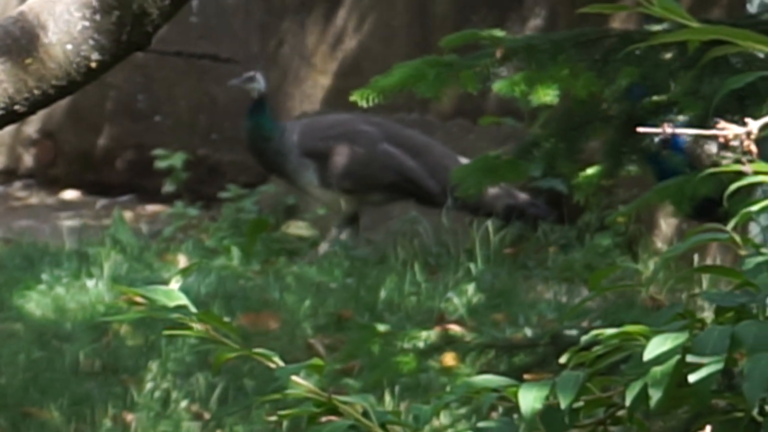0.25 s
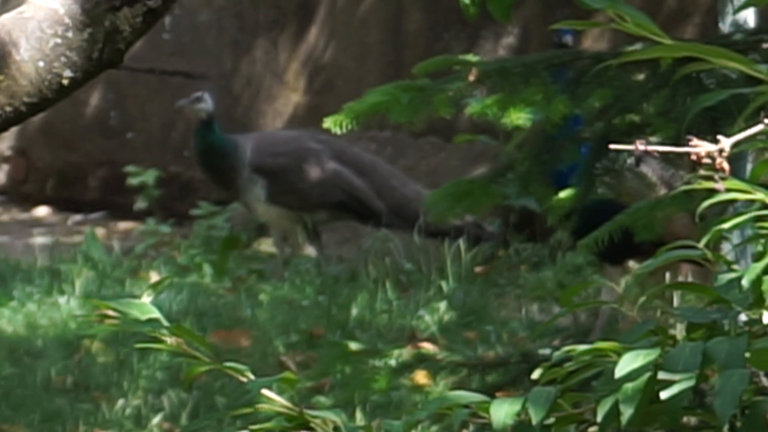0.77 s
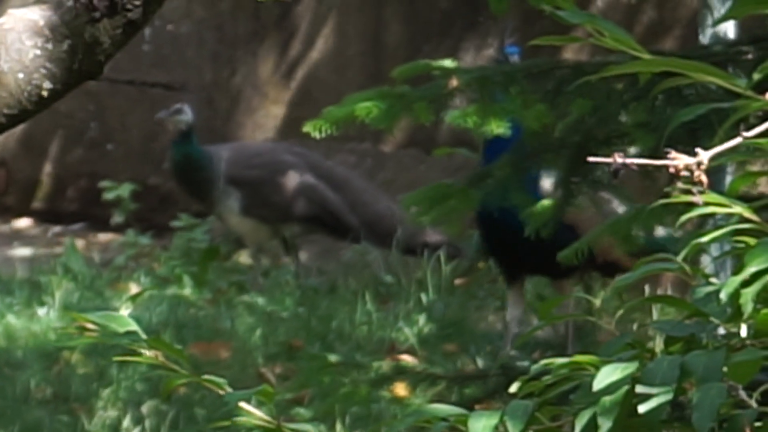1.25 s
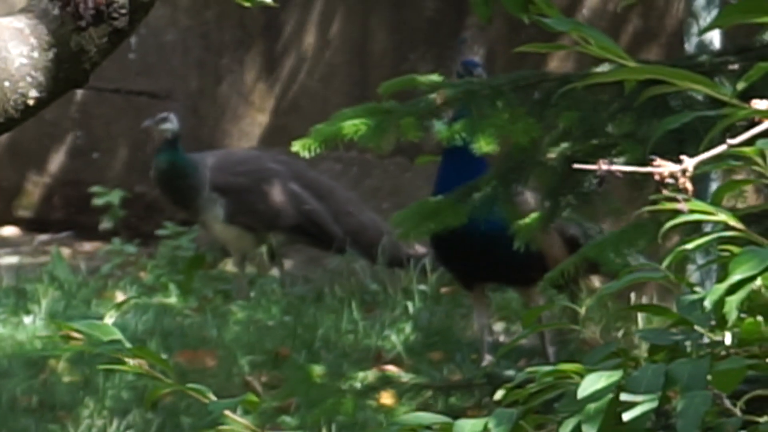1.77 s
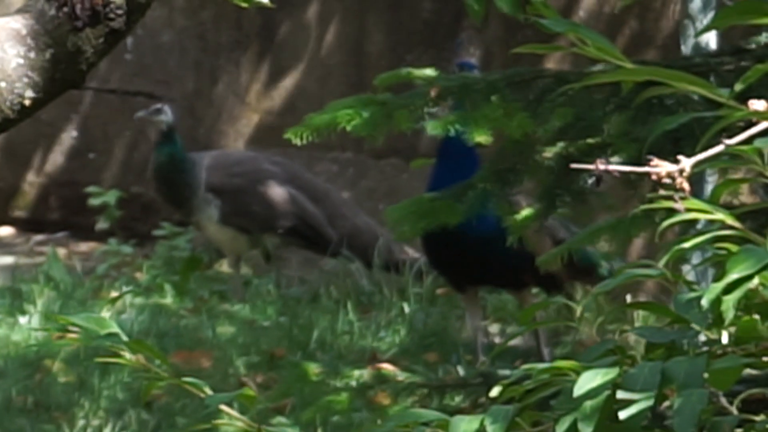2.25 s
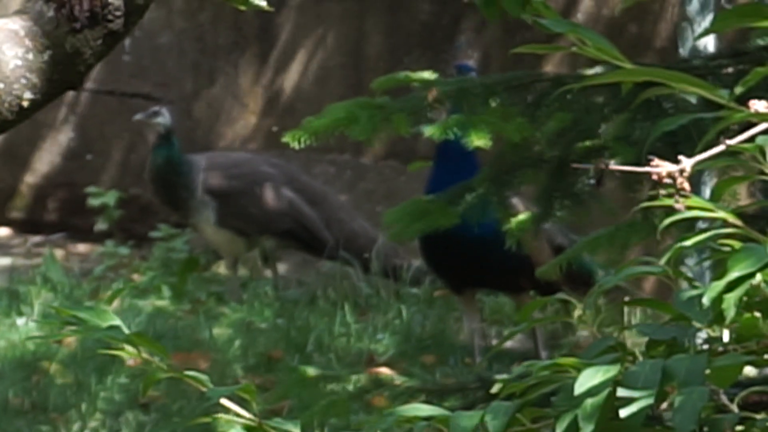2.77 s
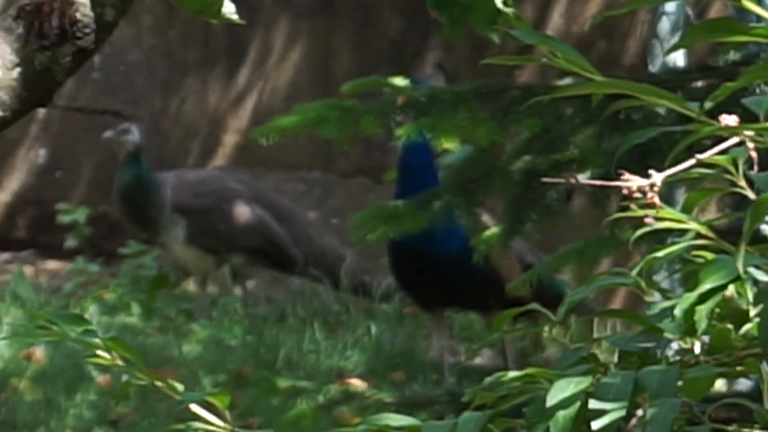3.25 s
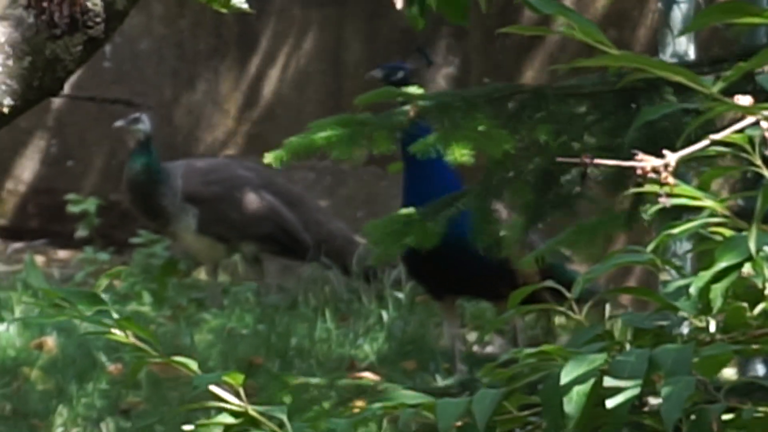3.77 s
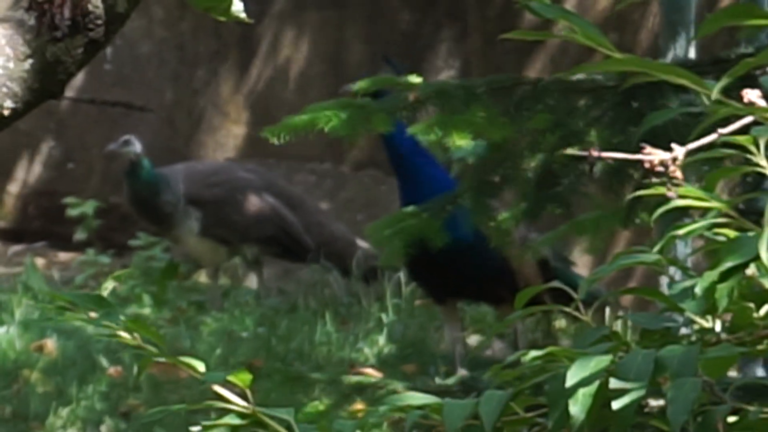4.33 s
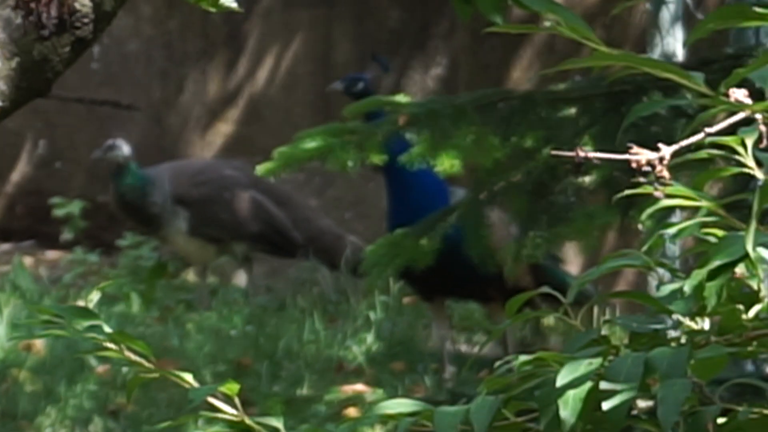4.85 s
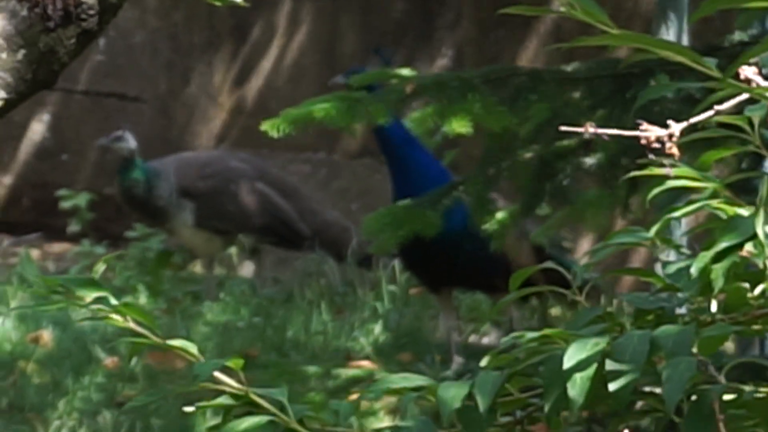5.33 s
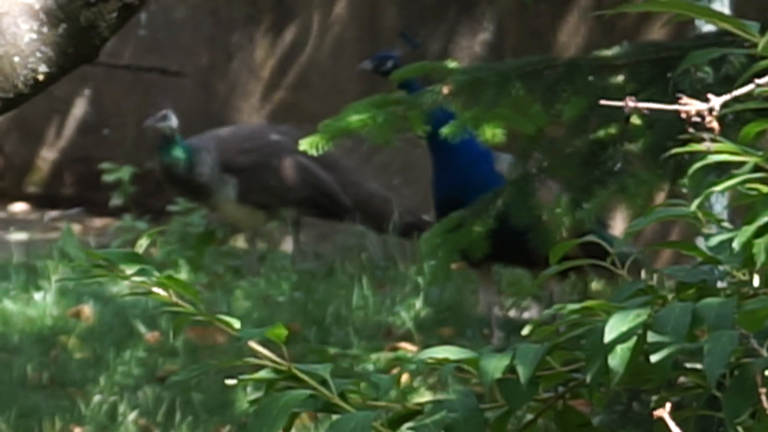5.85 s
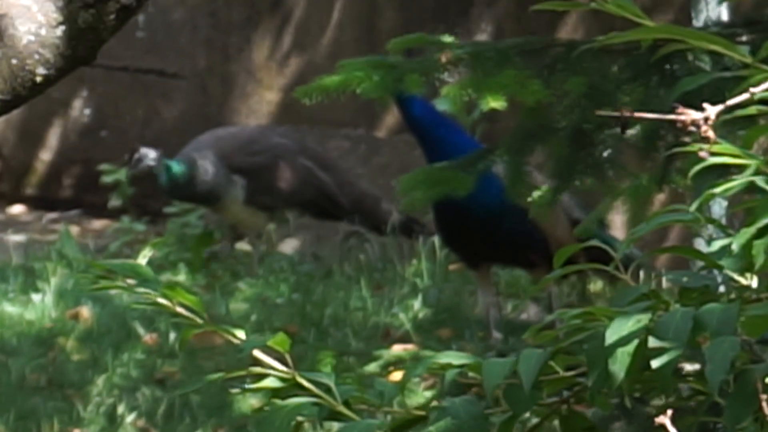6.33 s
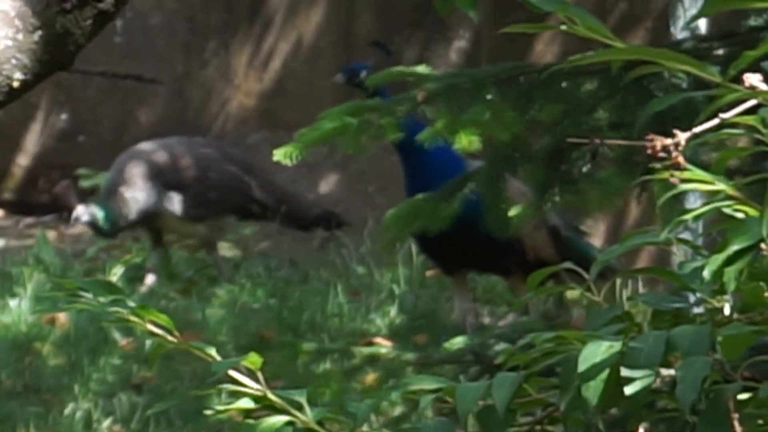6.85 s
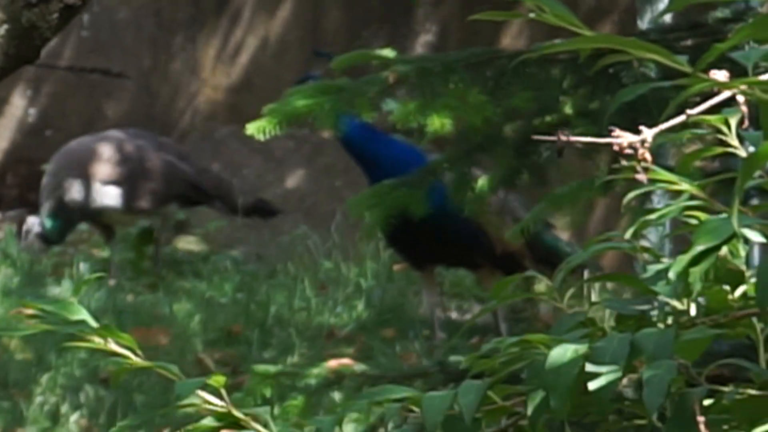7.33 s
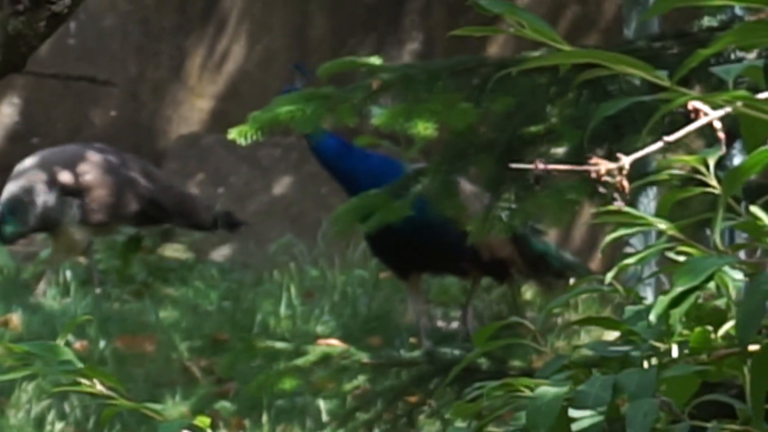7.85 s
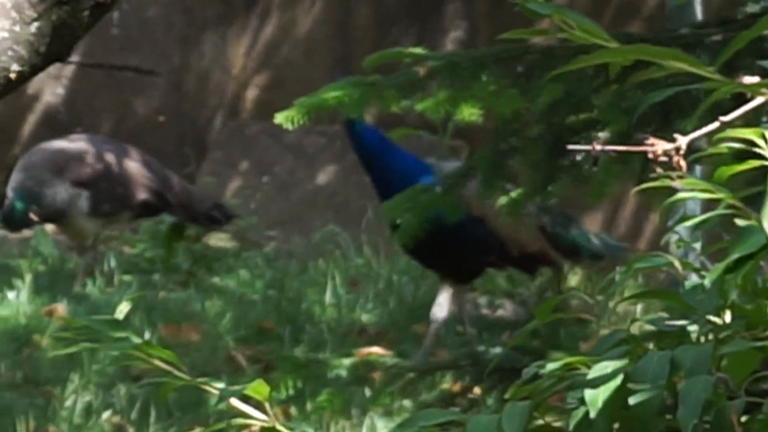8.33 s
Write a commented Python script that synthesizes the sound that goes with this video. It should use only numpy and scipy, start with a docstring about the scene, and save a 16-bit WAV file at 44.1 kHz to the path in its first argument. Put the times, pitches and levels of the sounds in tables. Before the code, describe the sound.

A peacock screams at once, from 0 to 0.9 seconds: a loud, brassy, slightly nasal cry that climbs from a medium pitch to its top near 0.5, then falls and roughens, on the right, with wall echoes and a short tail. Underneath lie soft garden noise and a slow one-cylinder engine, about eight or nine thumps a second. A hen whines thinly at 0.3 and clucks at 0.6, around 2 to 2.5, and repeatedly from 3.5 to 5.7, on the left. From 1 second to the end a sparrow gives raspy falling chirps, tiny high tsips and short whistles. The engine draws closer, its puffs sharper after 5 seconds, with light clanks between 5.7 and 8. Metal begins rubbing around 6.2, with a thin high hiss from 6.4 to 7; from 7.3 rattling and squealing grow strong until the end. The microphone's gain ducks under the scream and slowly recovers.

```python
"""A peacock screams once in a walled garden, over a soft noise bed and a slow one-cylinder engine.
The scream is a stack of partials shaped by windpipe, mouth and throat; the engine chugs closer with
thumps, puffs and clanks. A hen clucks in pulsed resonances; a sparrow chirps and whistles in swept sines.
At last the engine's metalwork rattles and squeals in wandering modes, with a brief thin hiss on top.
The recorder's gain control ducks under the scream and creeps back."""
import sys
import numpy as np
from scipy import signal
from scipy.io import wavfile
from scipy.ndimage import uniform_filter1d

SR = 44100
rng = np.random.default_rng(int(sys.argv[2]) if len(sys.argv) > 2 else 0)


def dump(signal):
    """Clip the signal to [-1, 1] and save it as 16-bit WAV at the path in sys.argv[1]."""
    limited = np.clip(np.atleast_2d(signal).T, -1, 1)
    pcm = np.round(limited * 32767).astype(np.int16)
    wavfile.write(sys.argv[1], SR, pcm)


N = 378819
T = np.arange(N) / SR


def gain_of(db):
    """Turns decibels into an amplitude factor."""
    return 10 ** (np.asarray(db) / 20)


def evened(x):
    """Brings a signal to rms 1."""
    return x / np.sqrt(np.mean(x ** 2) + 1e-20)


def read(points, hz):
    """Reads a (frequency, value) curve on a logarithmic frequency axis."""
    f, value = np.transpose(points)
    return np.interp(np.log(hz + 1), np.log(f + 1), value)


def curves(rows, t):
    """Draws straight lines through each column of a timed table."""
    s, *columns = np.transpose(rows)
    return [np.interp(t, s, c) for c in columns]


def add(mix, s, sound):
    """Mixes a sound in at s seconds, cut off at the end of the mix."""
    part = mix[round(s * SR):][:len(sound)]
    part += sound[:len(part)]


def pan(x, left_db):
    """Places a sound by level: left_db is left minus right."""
    return x * gain_of([[left_db / 2], [-left_db / 2]])


def high_pass(x, hz):
    """Third-order roll-off of the lows."""
    return signal.sosfilt(signal.butter(3, hz, "high", fs=SR, output="sos"), x)


def resonate(x, hz, width):
    """Shifts hz down to zero, smooths, and shifts back: a resonance of gain 1."""
    turn = np.exp(2j * np.pi * hz * np.arange(x.shape[-1]) / SR)
    r = np.exp(-np.pi * abs(width) / SR)
    return 2 * (turn * signal.lfilter([1 - r], [1, -r], x / turn)).real


# stereo likeness of the noise layers: (pitch_hz, likeness from -1 to 1)
LIKENESS = [(60, 1), (170, 1), (480, 0.9), (1350, 0.47), (3810, 0.16), (10700, -0.18)]
# stereo lean of the noise layers: (pitch_hz, left_minus_right_db)
STEREO_LEAN = [(60, 6), (170, -0.5), (480, 2.5), (1350, 3), (3810, 2.5), (10700, 2.0)]


def wash(spectrum, patchy_db, size=N):
    """Stereo noise of a given colour with patches drifting over time and frequency, rms 1."""
    frames, hz = size // 128 + 5, np.fft.rfftfreq(512, 1 / SR)
    a, b, c, d, patches = rng.standard_normal((frames, 257, 5)).T
    patches = evened(uniform_filter1d(uniform_filter1d(patches, 8, 0), 24, 1))
    same = np.clip(read(LIKENESS, hz), -1, 1)[:, None]
    left = a + 1j * b
    right = same * left + np.sqrt(1 - same ** 2) * (c + 1j * d)
    lean = gain_of(read(STEREO_LEAN, hz) / 2)[:, None]
    z = np.array([left * lean, right / lean])
    z *= gain_of(read(spectrum, hz)[:, None] + patchy_db * patches)
    noise = signal.istft(z, nperseg=512, noverlap=384)[1][:, :size]
    return evened(high_pass(noise, 84))


# wall echoes, relative to the echo send: (delay_s, left_db, right_db)
WALL_ECHOES = [(.009, -5.5, -33), (.021, -2, -17), (.034, -0.5, -18.5), (.052, -0.5, -8.5)]
# dying time of the yard's tail: (pitch_hz, t60_s)
YARD_DECAY = [(300, 0.57), (1500, 0.58), (3000, 0.58), (8000, 0.17)]


def yard(x, echo_db, tail_db):
    """A few wall echoes, plus sparse taps of random sign with each band dying at its own speed."""
    taps = np.zeros((2, 30000))
    at = np.arange(900, 29980, 20) + rng.integers(0, 20, (2, 1454))
    np.put_along_axis(taps, at, rng.choice([-1., 1.], at.shape), 1)
    hz, t, z = signal.stft(taps, SR, nperseg=256)
    fading = gain_of(-60 * t / read(YARD_DECAY, hz)[:, None])
    tail = signal.istft(z * fading, SR, nperseg=256)[1]
    tail *= gain_of(tail_db) / np.linalg.norm(tail[0])
    for s, left_db, right_db in WALL_ECHOES:
        tail[:, round(s * SR)] += gain_of(echo_db + np.array([left_db, right_db]))
    return signal.oaconvolve(x[None], tail, axes=1)[:, :N]


MOUTH_DB, MOUTH_WIDTH_HZ = -6, 202
SHUT_HZ, SHUT, OPENS_PER_HZ = 565, 0.37, 0.0021  # the beak opens with pitch and scales the throat
NASAL_HZ, NASAL_WIDTH_HZ, NASAL_DB, NASAL_FADE_HZ = 3530, 500, -14, 40  # rings while the pitch is low
CATCH_DB, CATCH_S = 5, .02  # the pitch shake comes in short catches
# course of the scream, levels before the mix, shake before its catches:
# (start_s, pitch_hz, effort_db, mouth_hz, level_db of the partials above the sixth, shake_cycles)
SCREAM_COURSE = [(0.0, 564, -29, 2100, -64, 0.0026), (0.088, 567.7, -18.5, 2280, -44.5, .003),
                 (0.118, 639.5, -15.5, 2100, -52, .008), (0.146, 691.6, -15.5, 1950, -40.5, 0.0048),
                 (0.296, 757, -18.5, 2250, -43.5, 0.004), (0.406, 796.4, -17, 2270, -30.5, .003),
                 (0.474, 809.8, -16.5, 2400, -31.5, .0008), (0.58, 794.2, -14.5, 2970, -37.5, .0008),
                 (0.646, 771.7, -18.5, 2965, -37.5, 0.0022), (0.728, 721, -14, 2370, -34.5, .007),
                 (0.822, 623, -16.5, 1880, -39, 0.0073), (0.89, 567, -19.5, 2310, -45, .025)]
# throat resonances at beak scale 1: (pitch_hz, width_hz, relative level_db)
THROAT_RESONANCES = [(4000, 550, -2), (6970, 2100, 6), (8300, 2350, -11)]
# windpipe colour of the low partials: (pitch_hz, level_db)
WINDPIPE_COLOUR = [(570, -29.5), (650, -22.5), (790, -14), (1140, -16.5), (1320, -9.5), (1560, 1),
                   (1750, -14), (2350, -14), (3050, -26.5), (3420, -28.5), (3700, -28), (4900, -35.5)]


def peacock():
    """Low partials pass windpipe and moving mouth, upper ones the throat; shake smears them."""
    t = T[T < SCREAM_COURSE[-1][0]]
    hz, effort_db, mouth_hz, top_db, shake = curves(SCREAM_COURSE, t)
    beak = SHUT + OPENS_PER_HZ * (hz - SHUT_HZ)

    catches = evened(uniform_filter1d(rng.standard_normal(len(t)), round(CATCH_S * SR)))
    wobble = evened(uniform_filter1d(uniform_filter1d(rng.standard_normal(len(t)), 200), 200))
    turns = np.cumsum(hz) / SR + shake * gain_of(CATCH_DB * catches) * wobble

    partials = np.arange(1, 7)[:, None] * hz
    mouth = gain_of(MOUTH_DB) / (1 + ((partials - mouth_hz) / MOUTH_WIDTH_HZ) ** 2) ** 2
    low = gain_of(effort_db) * (gain_of(read(WINDPIPE_COLOUR, partials)) + mouth)

    orders = np.arange(7, 19)[:, None]
    top = sum(gain_of(db) / (1 + ((orders * hz - f * beak) / width) ** 2)
              for f, width, db in THROAT_RESONANCES)
    # the strength of each partial from the fourth up wanders
    top *= gain_of(3 * evened(uniform_filter1d(rng.standard_normal(top.shape), 2500)))
    top *= gain_of(top_db) / np.sqrt((top ** 2).sum(0))
    low[3:] *= gain_of(3 * evened(uniform_filter1d(rng.standard_normal(low[3:].shape), 1500)))

    orders = np.arange(1, 19)[:, None]
    # follows the highest pitch so far, so the nasal ring does not return
    shut = np.exp(-np.maximum(np.maximum.accumulate(hz) - SHUT_HZ, 0) / NASAL_FADE_HZ)
    nasal_shape = 1 / (1 + ((orders * hz - NASAL_HZ) / NASAL_WIDTH_HZ) ** 2) ** 2
    nasal = gain_of(effort_db + NASAL_DB) * shut * nasal_shape
    waves = np.sin(2 * np.pi * orders * turns + orders ** 2)
    voice = np.sqrt(2) * ((np.vstack([low, top]) + nasal) * waves).sum(0)
    return np.pad(voice * signal.windows.tukey(len(t), .03), (0, N - len(t)))


FIRST_TURN = .804  # share of a turn already done at the start
PUFF_LEAD_S, PUFF_RISE_S, PUFF_FALL_S = 0.0081, 0.0025, .016  # the exhaust puff at each firing
CLANK_S, CLANK_LENGTH_S, CLANK_DB = 5.67, 2.4, -47  # the valve clank comes and goes
# engine speed: (start_s, firings_per_s)
ENGINE_SPEED = [(0, 8.976), (2, 8.691), (3.3, 8.291), (4.6, 7.651), (6.5, 7.972), (7.8, 8.028), (8.59, 8.3)]
# engine levels: (start_s, thump_db, roar_db between puffs, puff_db: change of the roar at a puff's peak)
ENGINE_LEVELS = [(0.0, -69, -41, -2), (1.0, -59, -49.5, -1), (1.79, -52, -50, 1.5), (3.95, -50, -42.5, 1.5),
                 (5.38, -53.5, -42.5, 10), (6.27, -54, -43.5, 9.5), (7.34, -54.5, -38.5, 4.5),
                 (7.63, -47, -36.5, 0.5), (8.59, -47, -36, 1)]
# exhaust pipe modes: (pitch_hz, relative level_db, t60_s)
PIPE_MODES = [(134.6, 0, 0.25), (153, -8.5, 0.31), (266, -12, 0.3), (329.7, -9.5, 0.19), (585, -17, 0.31)]
# colour of the roar: (pitch_hz, relative level_db per Hz)
ROAR_COLOUR = [(15, -50), (25, -19), (141, 4.5), (212, -17), (267, -24), (362, -43), (588, -2), (907, -4.5),
               (1060, 1.5), (1360, -2), (1510, -2), (4070, -3), (11000, -15), (14300, -76), (22000, -120)]


def engine():
    """Each firing gives a low thump, a pipe ring, a puff in the roar and, in its time, a later clank."""
    speed = curves(ENGINE_SPEED, T)[0]
    count = FIRST_TURN + np.cumsum(speed) / SR
    thump_db, roar_db, puff_db = curves(ENGINE_LEVELS, T)
    turn = count.astype(int)
    firing = np.diff(turn, prepend=0)

    fired = firing * gain_of(1.2 * rng.standard_normal(100))[turn]
    t = np.arange(9000) / SR
    push = np.sin(2 * np.pi * 75 * t) * (t / .007) * np.exp(-t / .007)
    pipe = sum(gain_of(db - 60 * t / t60) * np.sin(2 * np.pi * hz * t) for hz, db, t60 in PIPE_MODES)
    pipe *= 1 - np.exp(-t / 0.0043)
    thump = signal.oaconvolve(fired, high_pass(push + pipe, 42))[:N]
    thump = evened(np.roll(thump, -550))  # slightly ahead of the turn count

    from_puff = ((count + .5) % 1 - .5) / speed + PUFF_LEAD_S  # seconds from the puff's peak
    puff = np.exp(-abs(from_puff) / np.where(from_puff < 0, PUFF_RISE_S, PUFF_FALL_S))
    puff *= gain_of(2.2 * rng.standard_normal(100))[(count + .5).astype(int)]
    roar = wash(ROAR_COLOUR, patchy_db=2.0) * gain_of(roar_db) * (1 + (gain_of(puff_db) - 1) * puff)

    struck = firing * gain_of(2.5 * rng.standard_normal(100))[turn]
    struck = np.roll(struck, round(.024 * SR))
    clank = evened(resonate(struck, 1910, 72) + resonate(struck, 2330, 140))
    clank *= gain_of(CLANK_DB) * np.sin(np.pi * np.clip((T - CLANK_S) / CLANK_LENGTH_S, 0, 1))
    return pan(gain_of(thump_db) * thump, 0.5) + roar + pan(clank, 2.1)


GARDEN_DB = -42
# colour of the garden noise: (pitch_hz, relative level_db per Hz)
GARDEN_COLOUR = [(15, -55), (25, -25), (59, -48), (145, 3.5), (412, -2), (492, 0.5), (778, -0.5), (954, -6),
                 (1300, -3.5), (2510, -9.5), (4990, -14), (5530, -108), (11000, -27), (14300, -67),
                 (22000, -120)]
# slow drift of the garden noise: (start_s, level_db)
GARDEN_SWELL = [(0, 0.5), (1.2, 1), (2.2, 2.5), (3.2, 1), (4.5, -1.5), (6.5, 1.5), (8.59, -2.5)]


def garden():
    """Soft coloured stereo noise whose level drifts slowly."""
    noise = gain_of(GARDEN_DB) * wash(GARDEN_COLOUR, patchy_db=1.13)
    return noise * gain_of(curves(GARDEN_SWELL, T)[0])


WHINE_S, WHINE_LENGTH_S, WHINE_HZ, WHINE_ARCH_HZ, WHINE_DB = .3, 0.177, 903, 89, -29
CLUCK_HZ, CLUCK_GAP_S, CLUCK_FADE = 679, .0052, 0.78  # pitch and gaps vary a little by chance
# clucks, peak level before the mix: (start_s, level_db)
CLUCK_TIMES = [(0.561, -29), (1.994, -31.5), (2.263, -30.5), (2.482, -25.5), (3.539, -31), (3.735, -29),
               (3.956, -28.5), (4.487, -28.5), (4.701, -28), (4.898, -25), (5.104, -28.5), (5.352, -26.5),
               (5.721, -27)]


def hen():
    """A thin arched whine, then clucks: five soft pulses, second strongest, into mouth resonances."""
    out = np.zeros(N)
    arch = np.sin(np.pi * np.arange(0, WHINE_LENGTH_S, 1 / SR) / WHINE_LENGTH_S)
    whine = arch ** 2 * np.sin(2 * np.pi * np.cumsum(WHINE_HZ + WHINE_ARCH_HZ * arch) / SR)
    add(out, WHINE_S, gain_of(WHINE_DB) * whine)
    for (s, db), chance in zip(CLUCK_TIMES, rng.uniform(-1.06, 1, (len(CLUCK_TIMES), 6))):
        pulses, hz = np.zeros(3000), CLUCK_HZ * (1 + 0.064 * chance[0])
        gaps = CLUCK_GAP_S * (1 + .1 * chance[1:])
        at = ((np.cumsum(gaps) - gaps[0]) * SR).astype(int) + 60
        pulses[at] = CLUCK_FADE ** abs(np.arange(5) - 1)
        pulses = uniform_filter1d(pulses, 14)
        cluck = resonate(pulses, hz, 72)
        cluck += 0.44 * resonate(pulses, 1.367 * hz, 220)
        cluck += 0.05 * resonate(pulses, 1240, 400)
        add(out, s, gain_of(db) * cluck / abs(cluck).max())
    return out


HOOK_S, HOOK_RISE_HZ = 0.012, 489  # a chirp's opening hook slides up to its top note
SWOOP_S, SWOOP_FALL_S = .03, .009  # then it swoops again and again
SECOND_S, SECOND_DB = .009, 2  # the second voice of a chirp lags and is louder
CHIRP_HZ, CHIRP_RASP_HZ = 5250, 400  # top note of the hook, and rasp
WHISTLE_DROP_HZ, WHISTLE_RASP_HZ = 248, 40
# falling chirps, levels before the mix: (start_s, level_db, length_s, pitch_hz fallen towards)
FALLING_CHIRPS = [(1.442, -47.5, 0.087, 3190), (2.328, -49, 0.058, 3490), (2.491, -40.5, 0.071, 2965),
                  (3.025, -41.5, 0.071, 2775), (3.829, -41, 0.095, 3330), (4.921, -41, 0.085, 2970),
                  (5.416, -44, 0.069, 3760), (6.287, -40.5, 0.083, 3240), (6.787, -36.5, 0.083, 3364),
                  (8.168, -41, .09, 3294)]
# rising chirps: (start_s, level_db, length_s)
RISING_CHIRPS = [(2.064, -45.5, 0.068), (3.906, -43, 0.049)]
# short high tsips: (start_s, level_db, length_s)
HIGH_TSIPS = [(1.575, -52, 0.017), (2.62, -46, .03), (3.166, -44.5, 0.034), (5.056, -45, .04),
              (7.366, -37, 0.033)]
# nearly level whistles: (start_s, level_db, length_s, pitch_hz settled towards)
LEVEL_WHISTLES = [(0.981, -36, 0.054, 4800), (1.607, -36, 0.035, 4610), (2.645, -33, 0.061, 4805),
                  (2.821, -46, 0.038, 4460), (5.072, -37, 0.076, 4690), (6.942, -35, 0.071, 4560),
                  (8.157, -33.5, 0.045, 4150), (8.338, -40.5, 0.064, 4740)]
# sweep of a rising chirp: (start_hz, towards_hz, rasp_hz)
RISE_SWEEP = (4200, 4400, 470)
# sweep of a tsip: (start_hz, towards_hz, rasp_hz)
TSIP_SWEEP = (5900, 4750, 610)


def sparrow():
    """Sines tumble in quick broken swoops or whistle almost level; rasp shakes pitch and strength."""
    out = np.zeros(N)
    shaking = evened(resonate(rng.standard_normal((2, N)), 244, 327))
    chirps = [*FALLING_CHIRPS]
    chirps += [(s + SECOND_S, db + SECOND_DB, length, hz) for s, db, length, hz in FALLING_CHIRPS]
    notes = [(s, db, length, CHIRP_HZ, hz, CHIRP_RASP_HZ, HOOK_S) for s, db, length, hz in chirps]
    notes += [(*row, *RISE_SWEEP, 0) for row in RISING_CHIRPS]
    notes += [(*row, *TSIP_SWEEP, 0) for row in HIGH_TSIPS]
    notes += [(s, db, length, hz + WHISTLE_DROP_HZ, hz, WHISTLE_RASP_HZ, 0)
              for s, db, length, hz in LEVEL_WHISTLES]
    for s, db, length, start_hz, towards_hz, rasp, hook in notes:
        t = np.arange(0, length, 1 / SR)
        after = np.maximum(t - hook, 0)
        pitch_shake, level_shake = rasp * (t >= hook) * shaking[:, round(s * SR):][:, :len(t)]
        swoops = .15 + .85 * np.exp(-(after % SWOOP_S) / SWOOP_FALL_S)
        swoops *= np.exp(-after / (.6 * length))
        hz = towards_hz + (start_hz - towards_hz) * swoops
        hz -= HOOK_RISE_HZ * np.maximum(hook - t, 0) / HOOK_S
        hz += pitch_shake * np.exp(-t / (1.05 * length))  # the end is clearer
        hz = uniform_filter1d(hz, 60)
        size = gain_of(db + level_shake / 90) * signal.windows.tukey(len(t), .4)
        add(out, s, size * np.sin(2 * np.pi * np.cumsum(hz) / SR))
    return out


# colour of the rattle: (pitch_hz, relative level_db per Hz)
RATTLE_COLOUR = [(180, -45), (300, -60), (787, -32), (849, 0.5), (1200, -5.5), (2130, -9), (2510, 8.5),
                 (2830, -4.5), (3400, 2.5), (5180, -6.5), (11000, -7.5), (14300, -54), (22000, -120)]
# squealing modes of the metalwork: (pitch_hz, relative level_db)
METAL_MODES = [(850.6, -50), (947.5, -53), (1039, -52), (1750, -61), (2466, -45), (2600, -49), (2993, -54),
               (3278, -57), (3386, -57), (3523, -57), (3591, -55), (4086, -61), (4215, -54), (4495, -57),
               (4743, -63), (4904, -61), (5297, -54), (5712, -65), (6029, -59), (6595, -60), (6708, -63),
               (7117, -62), (7300, -61), (7720, -69), (8027, -67), (8403, -59), (8500, -64), (9028, -69),
               (9835, -68)]
# rubbing pressure: (start_s, level_db)
RUBBING = [(6.0, -42), (6.4, -7), (7.15, -11), (7.28, -1.5), (7.5, 2), (7.8, 2), (8.2, 3), (8.59, 2.5)]


def squeal():
    """Rubbing metal: narrow modes of wandering size and phase catch and let go over a broad rattle."""
    t = T[T > RUBBING[0][0]]
    slow = t[::64]
    out = gain_of(-38.5) * wash(RATTLE_COLOUR, patchy_db=-4.0, size=len(t))
    pressure_db, top_db = curves(RUBBING, slow)[0], max(db for hz, db in METAL_MODES)
    for hz, db in METAL_MODES:
        a, b, c, d, grip = rng.standard_normal((5, len(slow)))
        r = np.exp(-np.pi * (8 + .0015 * hz) * 64 / SR)  # higher modes wander faster
        wander = signal.lfilter([1], [1, -.8 * r], [a, b, c + 1.36 * a, d + 1.05 * b])
        wander = evened(signal.lfilter([1], [1, -r], wander))
        wander *= gain_of(db + 3.5 + 2 * evened(uniform_filter1d(grip, 120)))
        # light rubbing favours the strongest modes
        wander *= gain_of(.06 * (top_db - db) * (pressure_db - pressure_db.max()))
        a, b, c, d = (np.interp(t, slow, w) for w in wander)
        sine, cosine = np.sin(2 * np.pi * hz * t), np.cos(2 * np.pi * hz * t)
        out += [a * sine + b * cosine, c * sine + d * cosine]
    out = pan(out, -2.0) * gain_of(curves(RUBBING, t)[0])
    return np.pad(out, ((0, 0), (N - len(t), 0)))


SHRILL_S, SHRILL_LENGTH_S, SHRILL_DB = 6.4, .6, -55
SHRILL_HZ, SHRILL_WIDTH_HZ = 9200, 350  # width of each of two passes


def shrill():
    """A thin hiss high above the engine: twice-resonated noise that swells and fades."""
    out = np.zeros((N, 2))
    hiss = rng.standard_normal((2, round(SHRILL_LENGTH_S * SR)))
    hiss = resonate(hiss, SHRILL_HZ, SHRILL_WIDTH_HZ)
    hiss = evened(resonate(hiss, SHRILL_HZ, SHRILL_WIDTH_HZ))
    hiss *= gain_of(SHRILL_DB) * signal.windows.tukey(hiss.shape[1], .5)
    add(out, SHRILL_S, hiss.T)
    return out.T


def scene():
    """Places the birds in the yard and mixes them with engine, metalwork and garden noise."""
    cry, cluck, song = peacock(), hen(), sparrow()
    near = pan(cry, -6.0) * gain_of(5.5)
    near[0] = np.roll(near[0], 3)  # from the right: the left port hears it later
    near += yard(cry, echo_db=-2, tail_db=-10.0)
    hen_left = pan(cluck, 7.6) + yard(cluck, echo_db=-9, tail_db=-26.5)
    sparrow_left = pan(song, 6.0) + yard(song, echo_db=-9, tail_db=-12)
    return near + engine() + garden() + hen_left + sparrow_left + squeal() + shrill()


EDGE_HZ = 11080


def record(dry):
    """Slow gain control sinks under loud sound and creeps back; then the band limit."""
    power_db = 10 * np.log10(abs(uniform_filter1d((dry ** 2).mean(0), 2000)) + 1e-12)
    rise = T * 10.2  # the held level falls this many dB a second
    held_db = np.maximum.accumulate(power_db + rise) - rise
    over_db = np.maximum(held_db + 47.0, 0)
    r = np.exp(-1 / (.35 * SR))
    ducked = dry / gain_of(0.18 * signal.lfilter([1 - r], [1, -r], over_db))
    band_limit = signal.firwin(1023, EDGE_HZ, window=("kaiser", 11), fs=SR)
    return signal.oaconvolve(ducked, band_limit[None], "same")


dry = scene()
out = record(dry)
dump(out)
```